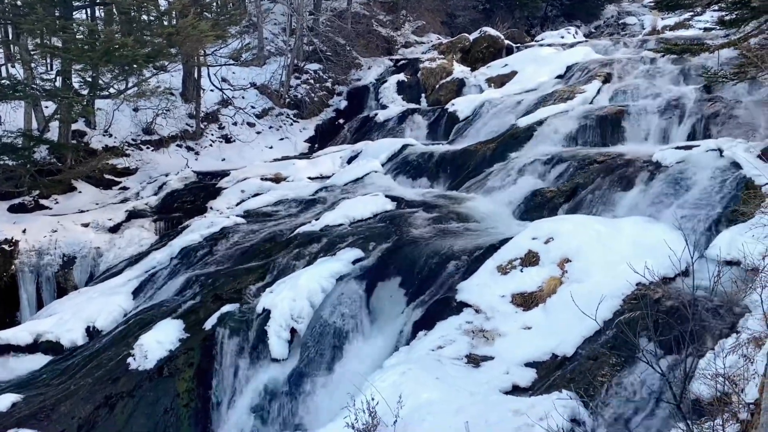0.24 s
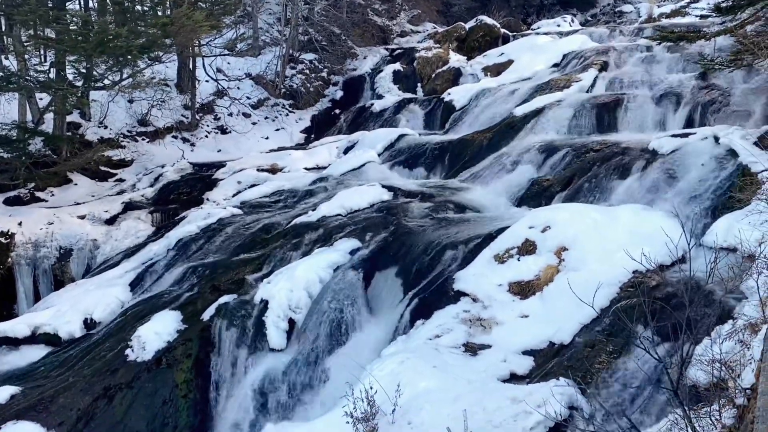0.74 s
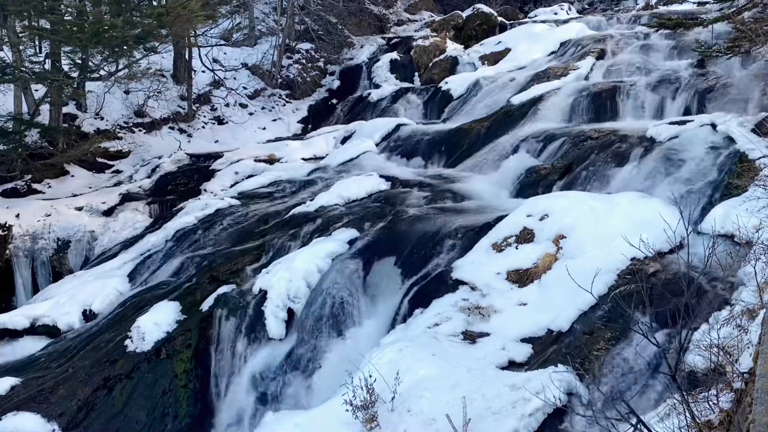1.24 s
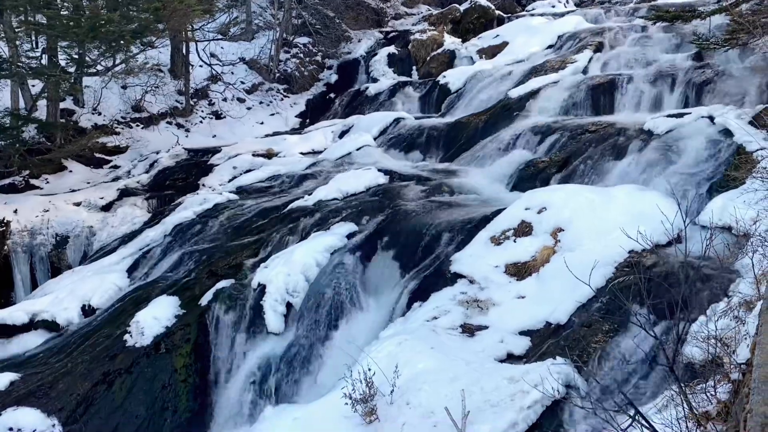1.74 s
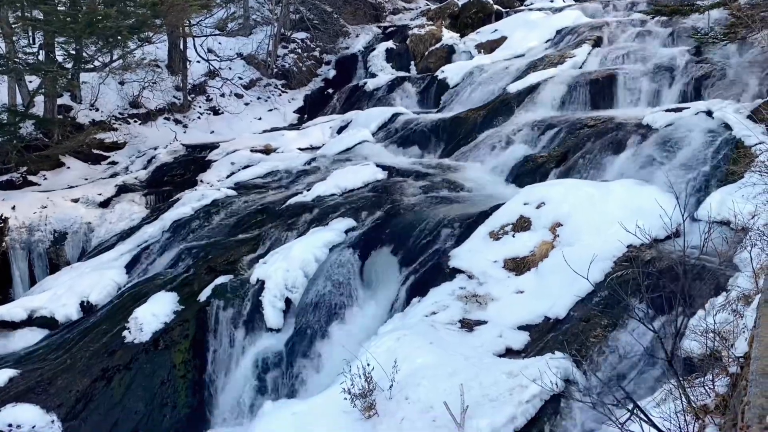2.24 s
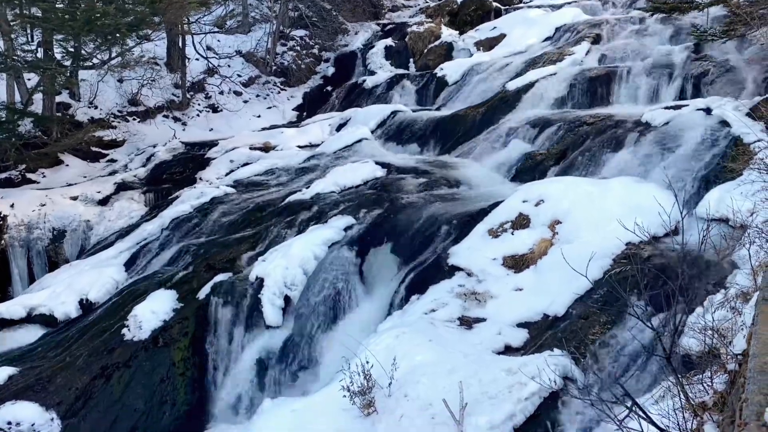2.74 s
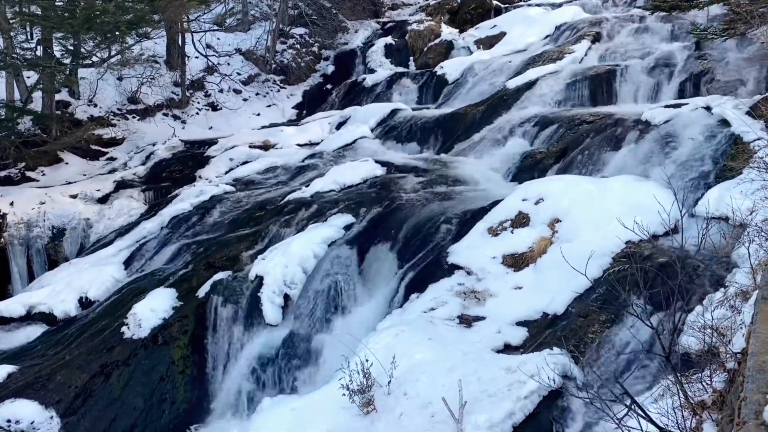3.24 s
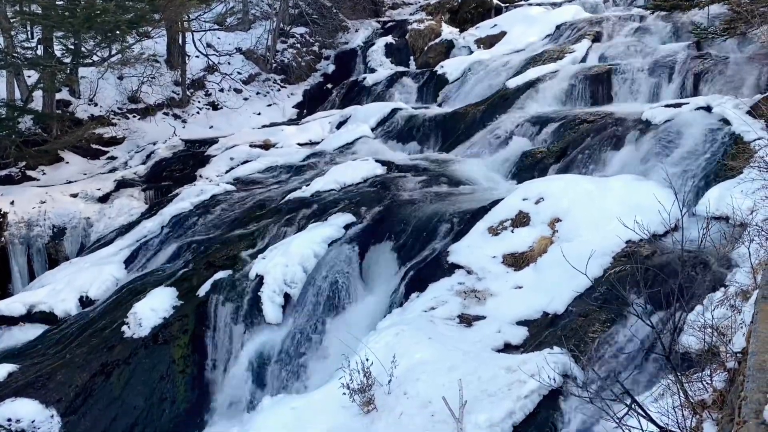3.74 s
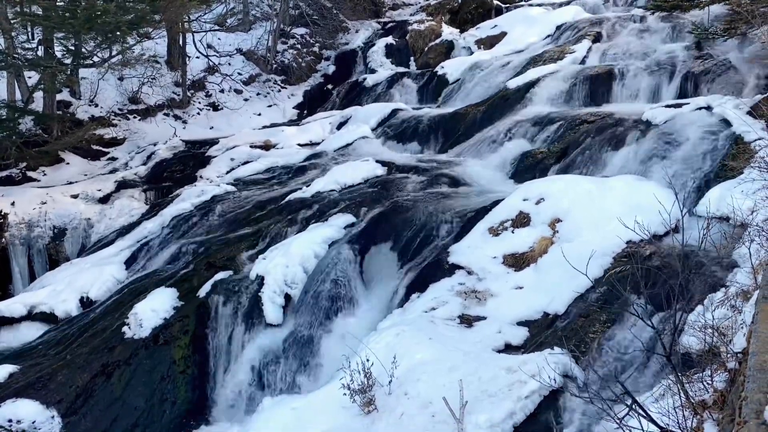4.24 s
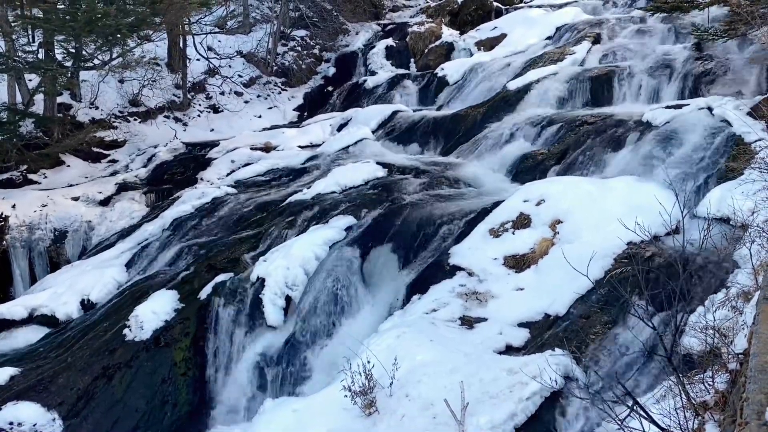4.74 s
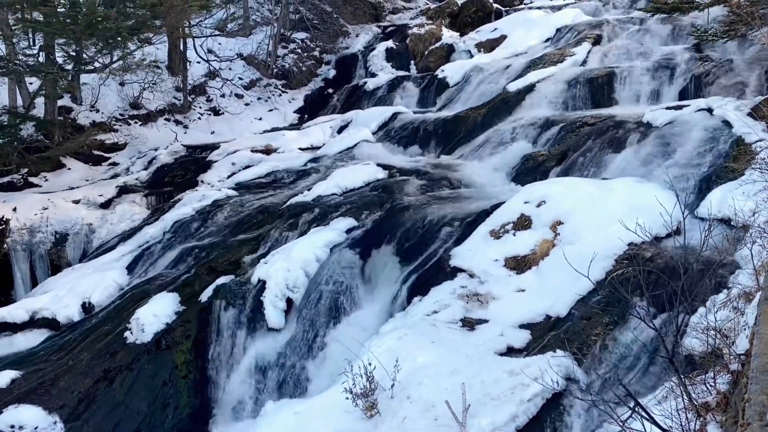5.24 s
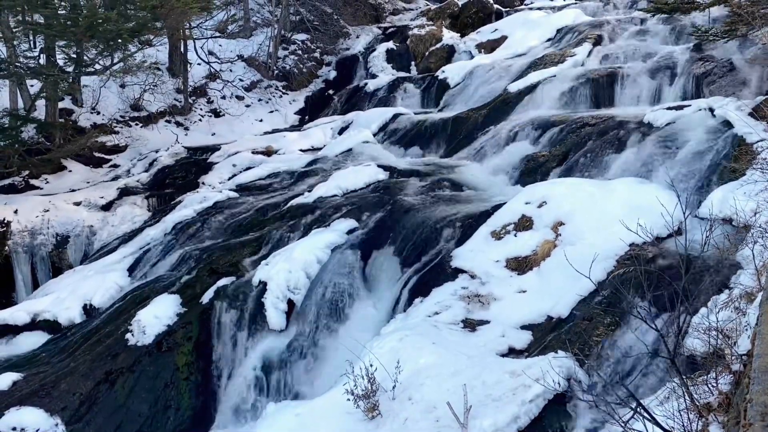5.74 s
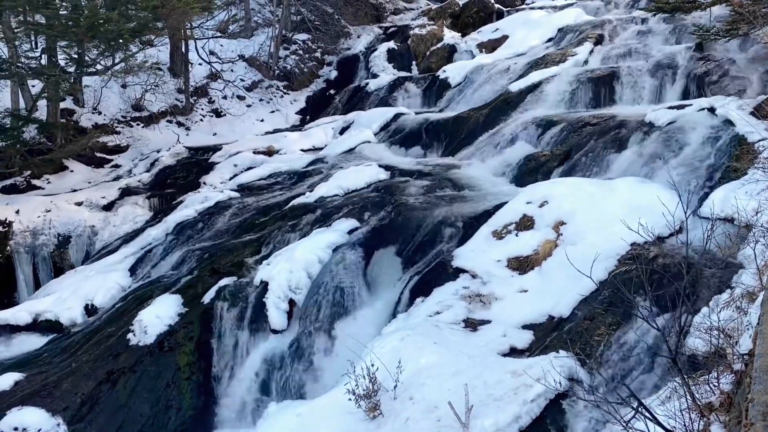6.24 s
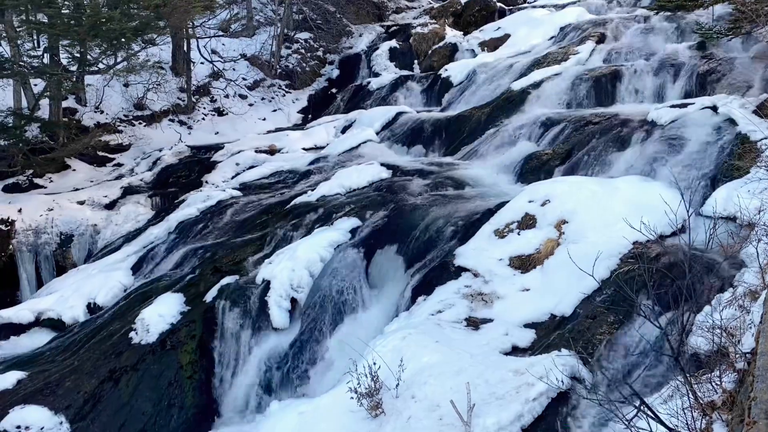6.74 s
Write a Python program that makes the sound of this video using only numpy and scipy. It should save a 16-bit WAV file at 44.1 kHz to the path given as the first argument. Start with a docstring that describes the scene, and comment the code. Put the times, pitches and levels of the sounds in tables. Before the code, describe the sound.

A waterfall rushes over rocks for the whole seven seconds, a steady, wide roar with a low rumble and a softer hiss of splashing. Over it, from the very start, small birds nearby give quick, high chirps that sweep up and flick down, mixed with short, level peeps. They come from several perches, mostly a little to the left, with a fainter flock twittering behind them. At about 1.9 seconds a crow on the left begins cawing, and it repeats at about 2.7, 3.6, 4.6, 5.6 and 6.6 seconds. Each caw is harsh and rattling, lasts about half a second and stands out as the loudest sound. The small birds are busiest and loudest from about 3.3 to 5.2 seconds, then grow sparser and quieter. Every call leaves a soft echo among the trees, while the water carries on unchanged to the end.

```python
"""A snowy wood by a waterfall. A crow on the left caws six times: its syrinx rattles open and
shut, and two resonances glide up in each pulse. Small birds whistle arched chirps and flat peeps
above a fainter flock. Trunks scatter every call into a soft tail. Behind them water rushes over
rock ledges, its bubbles and splashes merging into a steady roar."""
import sys
import numpy as np
from scipy import signal
from scipy.fft import rfft, irfft
from scipy.io import wavfile
from scipy.ndimage import uniform_filter1d, map_coordinates

SR = 44100
rng = np.random.default_rng(int(sys.argv[2]) if len(sys.argv) > 2 else 0)


def dump_mix(stems):
    """Bounce the given channels to the path in sys.argv[1] as a 16-bit WAV at rate SR."""
    frames = np.atleast_2d(stems).T  # one column per channel
    limited = np.clip(frames, -1, 1)  # hard clip at full scale
    pcm = np.round(limited * 32767).astype(np.int16)
    wavfile.write(sys.argv[1], SR, pcm)


N = 307377

# caws: t/s, length/s, level/dB, main resonance f/Hz, upper resonance f/Hz, upper re main/dB
CAWS = [(1.85, 0.46, -16.5, 1234, 1788, -7.5), (2.7, 0.47, -16.5, 1249, 1766, -8),
        (3.648, 0.47, -15.8, 1241, 1792, -7.5), (4.585, .48, -16, 1249, 1810, -10),
        (5.615, 0.49, -17, 1232, 1810, -9.5), (6.615, .46, -16.2, 1232, 1770, -11.5)]
# syrinx rattle: t/s into the caw, pulse rate/Hz
RATTLE_RATE = [(0, 58), (.07, 66), (.13, 98), (.2, 92), (.26, 58), (.36, 48), (.47, 45)]
# air in the crow's throat: f/Hz, relative level/dB
THROAT_AIR = [(400, -37), (700, -15.5), (900, -11), (1400, 6), (2100, -3), (2450, -1.5), (3000, -7),
              (4200, -23), (7000, -28.5)]
# arched chirps: t/s, rise/s, fall/s, start f/Hz, top f/Hz, bend exponent, level/dB, L-R/dB
CHIRPS = [(0.041, .145, .028, 3100, 6620, .92, -26.5, 5), (.235, .13, .034, 3340, 6560, 0.91, -27, 4),
          (.389, .079, .035, 3320, 5000, 1.4, -26.5, 2), (.452, .12, .035, 3550, 6850, 0.76, -29.5, 5),
          (.556, .035, .02, 2090, 4400, 1.1, -30, 4), (.767, .085, 0.026, 3640, 5560, 0.91, -25.5, 3),
          (.908, .11, .036, 3100, 6180, 0.98, -21.5, -2), (1.331, .11, .048, 3330, 6680, 1.17, -30, 0),
          (1.555, .062, .036, 3430, 4290, .93, -23, 2), (1.722, .06, .02, 4600, 6940, .86, -38, 4),
          (1.796, .13, .042, 2030, 6130, .66, -19, -3.5), (2.127, .115, .045, 2790, 6230, 0.7, -21.5, -4.5),
          (2.8, .17, .04, 4100, 6750, 1.06, -39.5, 7), (3.02, .055, .02, 5200, 6150, 1, -35, 4),
          (3.255, .03, .01, 3700, 5100, 1.4, -33.5, 6), (3.326, .118, 0.027, 3550, 4700, .55, -26.5, 5),
          (3.38, 0.077, .02, 4900, 6450, 1.2, -33, 4), (3.416, .119, 0.029, 3210, 6650, 0.83, -23.5, -4),
          (3.478, 0.076, 0.045, 3410, 4890, 1.5, -22, 2), (3.622, .08, .025, 3690, 4450, 1.3, -24, 3),
          (3.672, .034, .018, 3020, 4560, 1.2, -23, 2), (3.745, .042, .03, 3800, 4640, 1.5, -25, 1),
          (3.854, .114, 0.021, 3410, 6400, 1.24, -19, 2), (3.866, .095, 0.028, 3760, 5460, 1.3, -22.5, 4),
          (4.042, .042, .018, 2750, 4670, 0.84, -20.5, 3),
          (4.266, 0.059, 0.064, 2960, 5590, 0.85, -21.5, 4),
          (4.412, .068, .016, 2510, 4530, 1.22, -23.5, 3), (4.49, .077, .025, 4000, 4810, .8, -32.5, -2),
          (4.63, 0.077, .048, 3030, 4800, .78, -19, 3), (4.712, 0.11, .075, 4600, 6120, .75, -24.5, -6),
          (4.814, .016, .018, 2630, 3590, 1.06, -18.5, 3), (4.864, .007, .02, 3400, 3850, 1.1, -18.5, 3),
          (5.062, 0.09, 0.045, 2900, 6190, .75, -21.5, 3), (5.192, .009, 0.017, 2917, 3283, 1.1, -20, 3),
          (5.42, .045, .02, 4400, 6080, 1.2, -37, 3.5), (5.726, 0.085, .035, 4180, 6700, 0.57, -32, 6),
          (5.976, .15, .061, 2800, 6330, .68, -26.5, -4), (6.37, .11, .04, 5000, 6600, 1.4, -43, 2),
          (6.715, .085, 0.031, 4160, 6900, 1.4, -36, 2)]
# flat peeps: t/s, rise/s, fall/s, top f/Hz, level/dB, L-R/dB
PEEPS = [(.082, .04, .10, 4190, -29.5, 8), (.214, .012, 0.057, 3420, -28, 6),
         (.443, .012, .012, 3900, -23, 7), (.505, 0.011, .045, 1950, -33.5, 4),
         (.523, .08, .014, 4300, -33, 4), (.669, .04, .055, 3760, -30, 0.5),
         (.863, .024, 0.041, 4006, -27, 4), (.895, .02, .014, 1920, -32.5, 2),
         (1.083, .01, 0.085, 4430, -29.5, 10), (1.277, .049, .04, 3440, -30.5, 10),
         (1.75, .028, 0.011, 3530, -34, 5), (1.961, .005, 0.024, 2350, -26, -3),
         (2.157, .031, .027, 3400, -30, 4), (2.44, 0.025, 0.039, 3580, -21.5, 0),
         (2.563, 0.049, .085, 4094, -32.5, 6), (2.7, .01, .05, 3950, -32.5, 7),
         (3.793, 0.0217, 0.0197, 3590, -28, 6), (4.3, .07, 0.0152, 3700, -29.5, 5),
         (4.378, .005, 0.031, 2600, -28, 3), (4.872, .005, .045, 7950, -41, -1),
         (4.9, .095, 0.075, 4100, -26, -5), (5.218, 0.044, 0.024, 3520, -21, 4),
         (5.558, 0.022, 0.057, 4490, -30.5, 7.5), (5.75, .06, .03, 3570, -31, 8),
         (6.191, .005, 0.1, 3714, -27.5, -4), (6.502, .08, .06, 4120, -36, 3),
         (6.83, .03, .2, 3880, -33, -1), (6.87, .02, .16, 5750, -44, 0)]
# second harmonic of a whistle: its f/Hz, level/dB re fundamental
OVERTONE = [(5000, -33), (7000, -22.5), (8000, -20.5), (9000, -26), (11000, -19), (14000, -45)]
# flock loudness: t/s, relative level/dB
FLOCK_LEVEL = [(0.0, -25), (0.15, -28), (0.64, -28), (1.53, -31.5), (1.96, -35), (2.66, -31.5), (3.07, -34),
               (3.24, -34.5), (3.67, -25), (3.9, -25), (4.06, -26.5), (4.29, -28.5), (4.91, -25),
               (5.1, -24), (5.34, -32), (5.79, -32), (5.96, -33.5), (6.97, -32)]
# flock colour: f/Hz, gain/dB
FLOCK_COLOUR = [(1500, 4), (2000, 3), (2800, 0), (3500, 4), (4300, 1.5), (5000, -7), (6000, -7.5),
                (7500, -14)]
# water spectrum: f/Hz, relative level/dB
WATER_SPECTRUM = [(25, -44), (45, -40), (62, -40), (88, -7.5), (115, -1), (190, -3), (255, -8), (370, -9),
                  (520, -12.5), (950, -14), (1500, -18), (3000, -17.5), (8000, -28), (15000, -31)]
# water likeness between the ears: f/Hz, coherence
WATER_COHERENCE = [(60, 0.7), (130, 0.74), (300, 0.57), (700, .5), (1500, 1), (4000, 0.26), (9000, 0.18),
                   (15000, 0.02)]
# water balance: f/Hz, L-R/dB
WATER_PAN = [(60, 1.5), (110, 1.8), (200, 0), (400, 3.2), (900, 2.5), (2500, 1.5), (8000, 0)]
# low tones in the roar: f/Hz, level/dB
HUM_TONES = [(113, -39), (300, -46), (400, -45.5)]
# decay among the trees: f/Hz, T60/s
WOOD_T60 = [(500, 0.33), (1300, 1.62), (2500, 2.2), (4000, 0.88), (6500, 0.39), (12000, .3)]


def crow(direct_db=-1, early_db=-13, tail_db=-9.5, pan_db=6):
    """Caws from the left; each ear gets its own quick echoes, then the wood answers."""
    calls = np.zeros(N)
    for row in CAWS:
        add(calls, *caw(*row))
    early = gain(early_db) * np.array([near_echoes(calls), near_echoes(calls)])
    tail = gain(tail_db) * wood_tail(calls, coherence=1, build_s=.12)
    return panned(gain(direct_db) * calls + early + tail, pan_db)


def caw(at_s, length_s, level_db, main_hz, upper_hz, upper_db, attack_s=.068, release_s=.053,
        octave_db=-19, rasp_db=-17, air_db=-13):
    """The syrinx rattles open and shut; in each pulse two resonances glide upward."""
    t = np.arange(0, length_s, 1 / SR)
    pace_hz = np.interp(t, *np.transpose(RATTLE_RATE))
    # a fast rattle draws the resonances together and evens their strength
    tight = (pace_hz - pace_hz.min()) / np.ptp(pace_hz)
    main_hz = main_hz + 69.98 * tight
    upper_hz = upper_hz - 50 * tight
    onset = np.maximum(1 - t / attack_s, 0)
    ending = np.exp((t - length_s) / release_s)
    effort_db = level_db - 15 * onset - 5.5 * tight ** 2 - 4 * ending
    upper_db = upper_db + 9 * tight ** 2 + 5.5 * ending
    rate_hz = pace_hz * (1 + .05 * wobble(len(t), 39.9))
    cycle = np.cumsum(rate_hz) / SR % 1
    opening = (.95 + np.sin(np.pi * cycle) ** 2) * gain(.56 * wobble(len(t), 49.5))
    slack = (50 / rate_hz) ** 1.02  # slow pulses glide farther
    beak = 1 - .1 * np.exp(-t / .06) - .045 * np.exp((t - length_s) / .0398)  # opens, closes
    glide = .24 * (cycle - .5)
    main = phase_of(main_hz * (beak + slack * (glide + .0242 * wobble(len(t), 200))))
    upper = phase_of(upper_hz * (beak + slack * (glide + .0392 * wobble(len(t), 200))))
    voice = np.sin(main) + gain(upper_db) * np.sin(upper) + gain(octave_db) * np.sin(2 * main)
    voice *= 1 + gain(rasp_db) * wobble(len(t), 700)  # turbulence spreads each resonance
    voice += gain(air_db) * unit_rms(coloured(rng.standard_normal(len(t)), THROAT_AIR))
    edges = np.clip(np.minimum(t, length_s - t) / .014, 0, 1)
    return at_s, np.sqrt(2) * gain(effort_db) * unit_rms(opening) * voice * edges


def small_birds(direct_db=-.1, early_db=-6.6, tail_db=-6.7, perches=7):
    """Near birds call from several perches, each with its own echoes."""
    calls = [(*chirp(*note), pan_db) for *note, pan_db in CHIRPS]
    calls += [(*peep(*note), pan_db) for *note, pan_db in PEEPS]
    out = np.zeros((2, N))
    for perch in range(perches):
        mono, left, right = np.zeros((3, N))
        for at_s, sound, pan_db in calls[perch::perches]:
            for mix, part in zip((mono, left, right), (sound, *panned(sound, pan_db))):
                add(mix, at_s, part)
        early = gain(early_db) * near_echoes(mono)
        tail = gain(tail_db) * wood_tail(mono, coherence=.74, build_s=.0062)
        out += gain(direct_db) * np.array([left, right]) + panned(early + tail, pan_db=1)
    return out


def chirp(at_s, rise_s, fall_s, start_hz, top_hz, bend, level_db,
          full_hz=3640, thin_db_per_hz=.0032, end_hz=2293):
    """An arch that swells, thins above its fullest pitch and flicks down."""
    top_db = level_db - thin_db_per_hz * max(top_hz - full_hz, 0)
    return whistle(at_s, rise_s, fall_s, start_hz, top_hz, end_hz, bend,
                   rise_db=level_db, top_db=top_db, fall_db=level_db - 3.5, swell_db=2.5, pointed=.4)


def peep(at_s, rise_s, fall_s, top_hz, level_db, sag=.21):
    """A short, nearly level note that sags on both sides of its top."""
    shares = np.array([rise_s, fall_s]) / (rise_s + fall_s)
    start_hz, end_hz = top_hz * (1 - sag * shares ** 2)
    return whistle(at_s, rise_s, fall_s, start_hz, top_hz, end_hz, bend=.9,
                   rise_db=level_db - .8, top_db=level_db, fall_db=level_db + .6)


def whistle(at_s, rise_s, fall_s, start_hz, top_hz, end_hz, bend, rise_db=0, top_db=0, fall_db=0,
            swell_db=2, dip_db=2.5, burr_db=-19, pointed=0):
    """A wavering, slightly rough tone climbs to a round or pointed top, then drops."""
    length_s = rise_s + fall_s
    t = np.arange(0, length_s, 1 / SR)
    progress = np.minimum(t / rise_s, 1) ** bend
    climb = (1 - pointed) * np.sin(np.pi / 2 * progress) + pointed * progress ** .68
    drop = ((t - rise_s) / fall_s) ** 2
    hz = np.where(t < rise_s, start_hz + (top_hz - start_hz) * climb, top_hz + (end_hz - top_hz) * drop)
    waver = .011 * wobble(len(t), 55) + .006 * wobble(len(t), 250)
    flutter_db = 2.2 * wobble(len(t), 85)
    phase = phase_of(hz * (1 + waver))
    stages_s = [0, .27 * rise_s, .88 * rise_s, rise_s + .35 * fall_s, rise_s + .75 * fall_s, length_s]
    turn_db = (top_db + fall_db) / 2 - dip_db
    stages_db = [rise_db - swell_db, rise_db, top_db, turn_db, fall_db, fall_db - dip_db]
    level_db = np.interp(t, stages_s, stages_db) + flutter_db
    tone = np.sin(phase) + gain(lookup(OVERTONE, 2 * hz)) * np.sin(2 * phase)
    tone *= 1 + gain(burr_db) * wobble(len(t), 600)
    edges = np.sin(np.pi / 2 * np.clip(np.minimum(t, t[-1] - t) / .006, 0, 1))
    return at_s, np.sqrt(2) * gain(level_db) * tone * edges


def far_flock(count=480, trim_db=-3.5):
    """Many farther birds overlap, heard half through their echoes."""
    calls = np.zeros(N)
    for k, (when, length, pitch, slope) in enumerate(rng.random((count, 4))):
        at_s = (k + when) / count * N / SR
        hz = 2400 + 3200 * pitch
        if k % 2:  # quick arch
            note = whistle(at_s, .04 + .08 * length, .03, .7 * hz, 1.25 * hz, .6 * hz, bend=.8)
        else:  # flat note
            end_hz = hz * (.75 + .2 * slope)
            note = whistle(at_s, .03 + .05 * length, .04, .85 * hz, hz, end_hz, bend=.9)
        add(calls, *note)
    calls = coloured(calls, FLOCK_COLOUR)
    tail = wood_tail(calls, coherence=1, build_s=.0034)
    level_db = trim_db + np.interp(np.arange(N) / SR, *np.transpose(FLOCK_LEVEL))
    return panned(unit_rms(calls + tail) * gain(level_db), pan_db=1)


def waterfall(level_db=-27, patch_db=.96, surge_db=.4):
    """Countless bubbles and splashes merge into a roar with drifting patches and a slight surge."""
    frames, hz = N // 512 + 5, np.fft.rfftfreq(2048, 1 / SR)
    left_re, left_im, apart_re, apart_im, patches = rng.standard_normal((5, frames, len(hz)))
    patches = uniform_filter1d(patches, size=7, axis=0)
    patches = unit_rms(uniform_filter1d(patches, size=18, axis=1))
    surge = unit_rms(uniform_filter1d(rng.standard_normal(frames), size=24))[:, None]
    coherence = lookup(WATER_COHERENCE, hz)
    left = left_re + 1j * left_im
    right = coherence * left + np.sqrt(1 - coherence ** 2) * (apart_re + 1j * apart_im)
    lean = gain(lookup(WATER_PAN, hz) / 2)
    shape_db = lookup(WATER_SPECTRUM, hz) + patch_db * patches - surge_db * surge
    spectra = np.array([left * lean, right / lean]) * gain(shape_db)
    _, roar = signal.istft(spectra, nperseg=2048, noverlap=1536, time_axis=1, freq_axis=2)
    return gain(level_db) * unit_rms(roar[:, :N])


def water_hum(waver_hz=2.54):
    """Faint low tones waver inside the roar."""
    return sum(gain(db) * unit_rms(np.sin(phase_of(hz + waver_hz * wobble(N, 8))))
               for hz, db in HUM_TONES)


def near_echoes(x, decay_s=.038, density=.05):
    """Close rocks and branches return a quick spray of echoes."""
    t = np.arange(SR // 4) / SR
    taps = rng.standard_normal(len(t)) * (rng.random(len(t)) < density) * np.exp(-t / decay_s)
    return signal.oaconvolve(x, taps / np.linalg.norm(taps))[:N]


def wood_tail(x, coherence, build_s):
    """Trunks scatter a call into sparse echoes of random sign; the mids ring longest."""
    taps = np.zeros((2, SR))
    slots = np.arange(200, SR - 20, 20)
    arrivals = slots + rng.integers(0, 20, (2, len(slots)))
    np.put_along_axis(taps, arrivals, rng.choice([-1., 1.], arrivals.shape), 1)
    taps[1] = coherence * taps[0] + np.sqrt(1 - coherence ** 2) * taps[1]
    hz, t, spectra = signal.stft(taps, SR, nperseg=256)
    decay = gain(-60 * t / lookup(WOOD_T60, hz)[:, None])
    decay *= 1 - np.exp(-t / build_s)
    decay /= np.linalg.norm(decay, axis=1, keepdims=True)
    _, tail = signal.istft(spectra * decay, SR, nperseg=256)
    return signal.fftconvolve(x[None], tail / np.linalg.norm(tail[0]), axes=1)[:, :N]


def gain(db):
    return 10 ** (np.asarray(db) / 20)


def unit_rms(x):
    return x / np.sqrt(np.mean(x ** 2) + 1e-20)


def phase_of(hz):
    return 2 * np.pi * np.cumsum(hz) / SR


def lookup(table, hz):
    """Interpolates over log frequency."""
    table_hz, values = np.transpose(table)
    return np.interp(np.log(hz + 1), np.log(table_hz + 1), values)


def coloured(x, table):
    """Filters by a table of f/Hz, gain/dB."""
    hz = np.fft.rfftfreq(len(x), 1 / SR)
    return irfft(rfft(x) * gain(lookup(table, hz)), len(x))


def wobble(size, hz):
    """Smooth unit-rms noise up to about hz."""
    steps = np.arange(size) * hz * 2 / SR
    knots = rng.standard_normal(int(steps[-1]) + 4)
    return unit_rms(map_coordinates(knots, [steps + 1], order=2, mode="nearest"))


def panned(x, pan_db):
    """Stereo, pan_db = L-R."""
    return x * gain(np.array([[.5], [-.5]]) * pan_db)


def add(mix, at_s, sound):
    part = mix[round(at_s * SR):][:len(sound)]
    part += sound[:len(part)]


def scene():
    """Water, crow, near birds and flock."""
    return waterfall() + water_hum() + crow() + small_birds() + far_flock()


def record(dry):
    """Low-pass at 15.6 kHz."""
    lowpass = signal.firwin(511, 15600, window=("kaiser", 9), fs=SR)
    return signal.oaconvolve(dry, lowpass[None], "same")


dry = scene()
out = record(dry)
dump_mix(out)
```